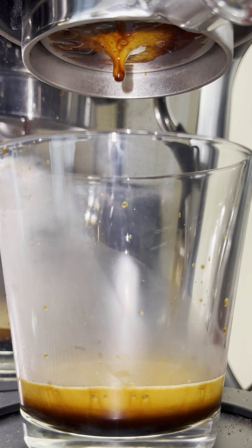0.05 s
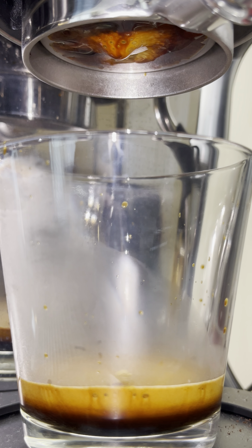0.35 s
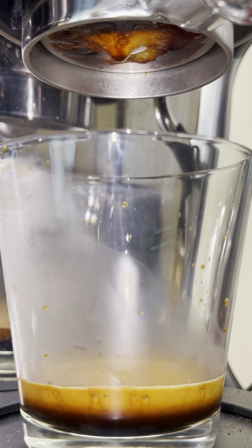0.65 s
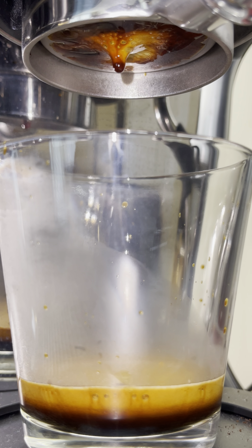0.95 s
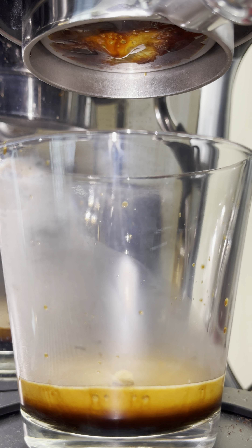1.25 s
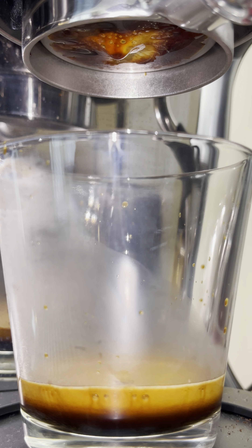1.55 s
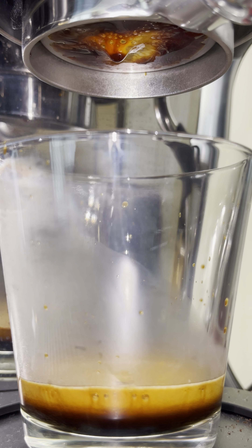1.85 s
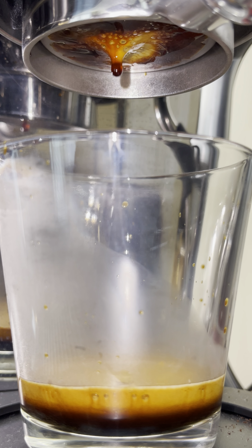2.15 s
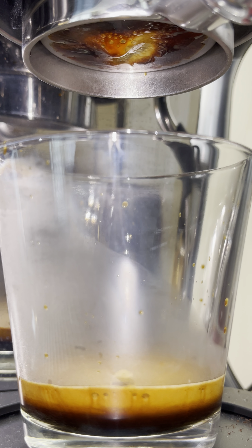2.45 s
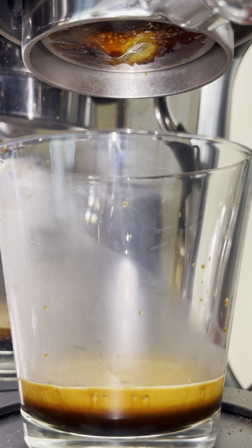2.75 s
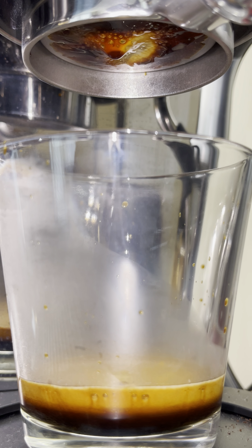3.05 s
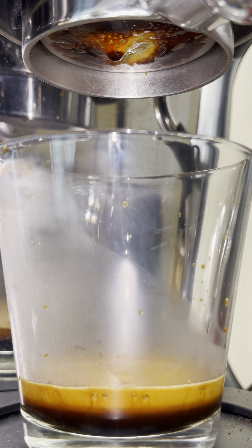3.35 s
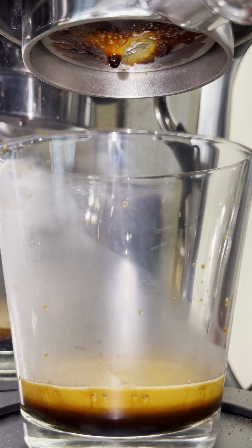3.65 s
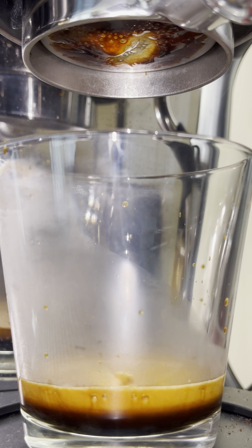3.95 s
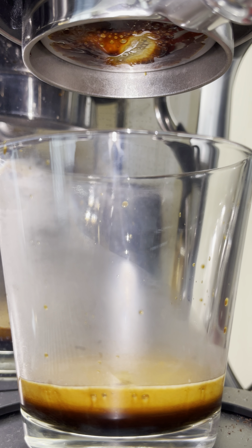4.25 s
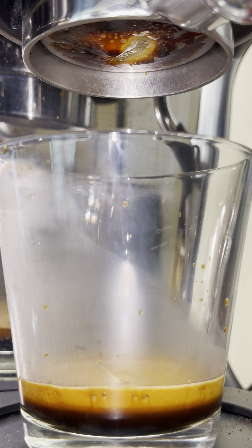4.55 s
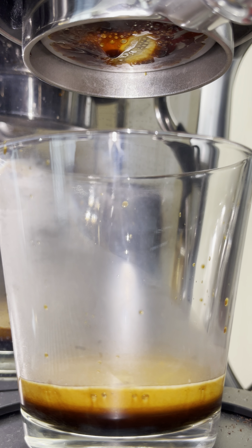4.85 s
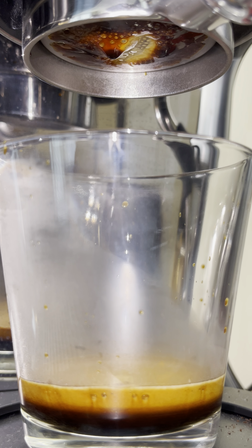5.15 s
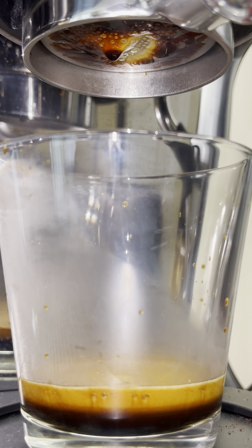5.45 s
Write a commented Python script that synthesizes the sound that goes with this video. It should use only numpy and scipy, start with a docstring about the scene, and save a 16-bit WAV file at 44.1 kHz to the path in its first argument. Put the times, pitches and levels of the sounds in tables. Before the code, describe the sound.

Coffee drops plip into a glass over an espresso machine's low hum and thin hiss, with one hollow knock early on.

```python
"""Motors hum in a small kitchen, a hot espresso machine buzzes and leaks a thin hiss, wet coffee seethes.
Close by, foam bubbles snap and the last drops plip into the crema, each ringing a pocket of air.
Just before the first second is up, the casing slips in its seat and gives one hollow knock.
The seething settles and the mains buzz dies away; the hiss turns brighter, a fan throbs,
and a faint whistle comes and goes near the end."""
import sys
import numpy as np
from scipy import signal
from scipy.fft import rfft, irfft
from scipy.io import wavfile

SR = 44100
rng = np.random.default_rng(int(sys.argv[2]) if len(sys.argv) > 2 else 0)


def pcm_store(signal):
    """Save signal as 16-bit PCM."""
    levels = np.round(np.clip(np.atleast_2d(signal), -1, 1) * 32767)
    wavfile.write(sys.argv[1], SR, levels.astype(np.int16).T)


N = 246959
TIME = np.arange(N) / SR
FREQ = np.maximum(np.arange(N // 2 + 1) * SR / N, 1)
KNOCK_S = 0.8619

# The motor drone. Each row: pitch in Hz, rms level at mid-scene in dB, level slope in dB per second.
MOTOR_TONES = [(46.3, -62, -0.5), (59.2, -54.5, -0.5), (87.5, -54, -0.5), (94.9, -69, 2),
               (213.6, -72.5, -1), (223.2, -63.5, -1.57), (239, -72.5, 1), (363, -76, .5), (363, -77, -1),
               (449, -75, -2.5), (503, -77.5, 0.5), (528, -77, -0.5), (554, -86.5, -2.5), (597, -79, -2.5),
               (950, -90.5, 1.5), (1121, -95, 2.5)]
# The fan's level ride. Each row: time in seconds, rms level of its stronger tone in dB.
FAN_RIDE = [(0, -60), (1.2, -60), (2.6, -66.5), (3.5, -59.5), (5, -54.5), (5.6, -55.5)]
# Room tone of moving air. Each row: frequency in Hz, level in dB per Hz.
RUMBLE_SPECTRUM = [(15, -116), (28, -91), (45, -82), (95, -75.5), (135, -80), (195, -83), (220, -77.5),
                   (255, -86), (335, -80), (510, -87.5), (610, -94.5), (730, -94), (850, -100),
                   (1020, -100), (1350, -104), (1700, -113), (5000, -130), (14000, -144)]
# Stereo image of the rumble. Each row: frequency in Hz, left-right likeness from 0 (wide) to 1 (mono).
RUMBLE_LIKENESS = [(60, 1), (130, 0.98), (270, 0.97), (580, 0.49), (1000, 0.023), (2000, 1), (5000, 0.56)]
# Panning of rumble and hiss. Each row: frequency in Hz, left minus right in dB.
AIR_BALANCE = [(60, 0), (110, -.5), (190, -2), (350, -2), (1100, -1.2), (2800, -.5), (4500, -2.8),
               (5700, 0)]
# The leak's resonances, in three registers. Each row: centre in Hz, width in Hz,
# crest level in dB per Hz before the level ride, left lead in ms.
LEAK_LOW = [(2270, 810, -108.5, 0.046), (3024, 170, -106.5, 0.074), (3650, 580, -112.5, 0.043)]
LEAK_MID = [(4420, 300, -99.3, -0.044), (4900, 240, -104, 0.103), (5720, 300, -99, 0.169),
            (6280, 470, -104, 0.17), (6800, 250, -107, 0.173), (7390, 290, -101.5, 0.17)]
LEAK_HIGH = [(8140, 500, -115.0, 0.171), (9160, 290, -114.5, 0.165), (9790, 290, -107.5, 0.162),
             (10480, 450, -104.0, 0.162), (11040, 390, -106.0, 0.16), (11510, 220, -114.0, 0.159),
             (12020, 230, -112.5, 0.16)]
# A very high sheen. Each row: centre in Hz, width in Hz, crest level in dB per Hz before the ride.
SHEEN_BANDS = [(12900, 350, -129), (13550, 280, -125), (14800, 450, -129)]
# Tone colour of the mains buzz. Each row: frequency in Hz, rms level in dB before the fade.
BUZZ_SPECTRUM = [(840, -91), (960, -84), (1200, -81.5), (1320, -79.5), (1560, -81), (1680, -85.5),
                 (1920, -86), (2400, -99.5), (3600, -104)]
# Tone colour of the wet coffee. Each row: frequency in Hz, level in dB per Hz before the fade.
SEETHE_SPECTRUM = [(200, -110), (600, -99), (1250, -101), (2000, -109), (3500, -118), (9000, -135)]
# Foam films bursting. Each row: start in seconds, level in dB, centre in Hz, width in octaves,
# fizz in dB relative to the crack.
FOAM_SNAPS = [(0.077, -67.5, 3800, 0.79, -10), (0.216, -63, 4500, 1, -2), (0.235, -40.5, 2500, 1.1, -6),
              (0.2366, -41, 6300, 0.44, -10), (0.249, -49.5, 3000, .9, 7), (0.2487, -42.5, 6250, 0.38, -7),
              (1.002, -63, 3000, 0.25, -23), (1.013, -64, 2000, 1.6, -20), (1.147, -65, 3900, .8, -16),
              (1.157, -49, 5900, 0.14, -20), (1.4396, -58, 4600, 0.68, 4), (2.343, -64, 4100, .5, -20),
              (2.352, -62, 3200, 1.1, -20), (2.684, -65, 1100, 1.6, -20), (3.8991, -42.5, 5300, 0.26, -5),
              (4.048, -58, 3480, 1.2, -18)]
# Air pockets ringing in the glass. Each row: start in seconds, level in dB, starting pitch in Hz,
# time to fall 60 dB in seconds.
AIR_POCKETS = [(0.2168, -46, 1520, .026), (0.2349, -33.5, 2360, 0.021), (0.2351, -41, 1680, 0.022),
               (0.2352, -40, 3500, .014), (0.2365, -49, 1314, 0.061), (0.24, -38, 476, 0.044),
               (0.2492, -49, 2450, 0.026), (0.249, -52, 1000, 0.045), (0.249, -52, 1520, 0.035),
               (0.2523, -45, 3000, 0.026), (1.002, -49, 2570, .016), (1.014, -55, 1320, 0.034),
               (1.146, -52, 1550, .022), (1.4395, -42.5, 1125, .027), (1.559, -59, 1290, .03),
               (2.321, -60, 1580, .026), (2.3424, -56.5, 1290, 0.045), (2.683, -47.5, 421, 0.079),
               (2.686, -65, 3420, .035), (3.867, -58, 1590, 0.024), (3.8995, -45.5, 1600, 0.019),
               (3.8997, -47, 2320, 0.017), (3.8996, -33, 5320, 0.0082), (3.9002, -38.5, 4340, 0.012),
               (3.9014, -41.5, 3810, .021), (4.047, -55.5, 2390, .02)]
# Modes of the casing's panels. Each row: pitch in Hz, peak level in dB, time to peak in seconds,
# left lead in ms, left minus right in dB.
PANEL_MODES = [(151.2, -36, 0.018, 0.18, 2), (205, -40, 0.017, 0, -0.5), (278.3, -27.5, 0.0045, 0.018, 2),
               (402, -19.5, 0.0063, 0.079, -1.5), (538, -39, 0.016, -0.1, -1.5),
               (630, -40, .011, 0.0069, -4), (730, -35.5, 0.012, 0.31, 4), (800, -41, 0.013, -0.049, 2),
               (1024, -34.5, 0.0063, 0.19, -2.5), (1225, -36, 0.0084, -0.16, 9),
               (1501, -35, 0.006, -0.084, 0.5), (1688, -34.5, 0.0038, 0.058, -1),
               (2046, -22, 0.0032, 0.036, -.5), (2317, -43, 0.006, 0.079, 0),
               (2450, -41.5, .006, 0.092, 2.5), (3076, -30.5, 0.0039, 0.029, 0),
               (3440, -31.5, 0.0021, -0.051, -1), (3850, -45.5, 0.005, -0.11, 10),
               (4130, -41, 0.0038, -0.072, -1), (4410, -37, 0.0051, 0.078, -5)]
# The whistle's level ride. Each row: time in seconds, rms level in dB.
WHISTLE_RIDE = [(2.6, -92), (3.8, -84), (4.1, -77.5), (4.25, -85), (4.44, -73), (4.58, -85.5), (5.0, -81),
                (5.23, -87), (5.5, -81.5)]


def from_db(db):
    """Decibels to gain."""
    return 10 ** (np.asarray(db) / 20)


def over_hz(points):
    """Spread (Hz, value) breakpoints over every frequency, on a log scale."""
    hz, value = np.transpose(points)
    return np.interp(np.log(FREQ), np.log(hz), value)


def noise(gain):
    """Noise with the given amplitude per root Hz."""
    return irfft(rfft(rng.standard_normal(N)) * gain * np.sqrt(SR / 2), N)


def diffuse(gain, alike):
    """Mid-side noise, from wide (alike 0) to mono (alike 1)."""
    mid = noise(gain * np.sqrt((1 + alike) / 2))
    side = noise(gain * np.sqrt((1 - alike) / 2))
    return np.array([mid + side, mid - side])


def drift(rate_hz):
    """Slow random modulation with spread 1."""
    slow = noise(1 / (1 + (FREQ / rate_hz) ** 2))
    return (slow - slow.mean()) / slow.std()


def tone(hz, db, wobble_rad=0):
    """A sine at the given rms level, with optional phase wobble."""
    return np.sqrt(2) * from_db(db) * np.sin(2 * np.pi * (hz * TIME + rng.random()) + wobble_rad)


def crackle(size, centre_hz, octaves, grain_db=5, grain_samples=24):
    """Tiny noise grains of uneven size in one band, rms 1."""
    edges_hz = np.clip(centre_hz * 2 ** (np.array([-.5, .5]) * octaves), 20, SR / 2 - 1000)
    grain_gains = from_db(grain_db * rng.uniform(-1, 1, size // grain_samples + 1))
    grains = np.repeat(grain_gains, grain_samples)[:size] * rng.standard_normal(size)
    band = signal.sosfilt(signal.butter(2, edges_hz, "band", fs=SR, output="sos"), grains)
    return band / band.std()


def dying(t, t60):
    """Exponential decay, 60 dB down after t60 seconds."""
    return np.exp(-np.log(1000) * t / t60)


def settling(settle_s):
    """A ramp from 0 towards 1 that moves ever more slowly."""
    return 1 - np.exp(-TIME / settle_s)


def swell(t, peak_s, steepness):
    """An envelope that builds to 1 at peak_s and dies again."""
    return (t / peak_s * np.exp(1 - t / peak_s)) ** steepness


def from_side(x, lead_ms, left_db=0):
    """Pan by time and level: positive values make the left side earlier and louder."""
    hz = np.arange(len(x) // 2 + 1) * SR / len(x)
    late = irfft(rfft(x) * np.exp(-2j * np.pi * hz * lead_ms / 1000), len(x))
    return np.array([x * from_db(left_db / 2), late * from_db(-left_db / 2)])


def add(out, start_s, sound):
    """Mix a short sound in at its cue."""
    start = int(start_s * SR)
    out[:, start:start + sound.shape[-1]] += sound


def motors(wander_rad=0.14, waver_db=1.0):
    """Motor tones waver slightly in pitch and level and beat against each other."""
    out = np.zeros(N)
    for hz, db, db_per_s in MOTOR_TONES:
        ride_db = db + db_per_s * (TIME - TIME.mean()) + waver_db * drift(1.5)
        out += tone(hz, ride_db, wander_rad * drift(0.8))
    return out


def fan(hz=111.7, partner_hz=107.55, partner_db=-6.5):
    """Two close tones throb about four times a second as they ebb and swell."""
    db = np.interp(TIME, *np.transpose(FAN_RIDE))
    return tone(hz, db) + tone(partner_hz, db + partner_db)


def rumble():
    """Moving air fills the room with a low bed, near mono in the bass."""
    return diffuse(from_db(over_hz(RUMBLE_SPECTRUM)), over_hz(RUMBLE_LIKENESS))


def jet(resonances):
    """Turbulence rings in the narrow passages of the leak, each panned by its own delay."""
    return sum(from_side(noise(from_db(db) / (1 + 2 * ((FREQ - hz) / width) ** 2)), lead_ms)
               for hz, width, db, lead_ms in resonances)


def hiss(waver_db=0.67, sheen_lead_ms=0.148):
    """The hiss brightens: lows and mids fade, highs level off; a faint, very high sheen fades in."""
    low_db = 0.5 - 0.94 * TIME
    mid_db = 0.5 - 1.28 * TIME + waver_db * drift(2.3)
    high_db = 1.5 + 8 * settling(settle_s=0.76) + waver_db * drift(1.5)
    sheen_db = -7.5 + 2.5 * TIME
    sheen = [(*row, sheen_lead_ms) for row in SHEEN_BANDS]
    layers = (sheen_db, sheen), (mid_db, LEAK_MID), (high_db, LEAK_HIGH), (low_db, LEAK_LOW)
    return sum(from_db(ride_db) * jet(resonances) for ride_db, resonances in layers)


def lean_right(x):
    """Tip some bands a little to the right."""
    return irfft(rfft(x) * from_db(over_hz(AIR_BALANCE) * [[.5], [-.5]]), N)


def buzz(fundamental_hz=120, start_db=1.5, sag_db_per_s=5.5, stop_s=2.4):
    """A coil shakes the sheet metal at twice the mains rate; its upper harmonics sag, then die away."""
    hz, db = np.transpose(BUZZ_SPECTRUM)
    harmonics = fundamental_hz * np.arange(7, 28)
    sag = from_db(start_db - sag_db_per_s * TIME)
    release = dying(np.maximum(TIME - stop_s, 0), t60=0.87)
    return sag * release * sum(tone(f, np.interp(f, hz, db)) for f in harmonics)


def seethe(start_db=-1.5, sink_db=19.5):
    """The wet coffee seethes softly and settles to a lower level."""
    fade = from_db(start_db - sink_db * settling(settle_s=1.7))
    return fade * diffuse(from_db(over_hz(SEETHE_SPECTRUM)), alike=0.66)


def snaps(attack_s=0.00068):
    """A bursting foam film gives a short wet crackle with a fizz of droplets on top."""
    out, t = np.zeros((2, N)), TIME[:SR // 8]
    for start_s, db, hz, octaves, fizz_db in FOAM_SNAPS:
        fizz = crackle(len(t), centre_hz=11000, octaves=.17) * dying(t, t60=0.015)
        crack = crackle(len(t), hz, octaves) * dying(t, t60=0.0062 + 0.027 * octaves)  # broad lasts longer
        burst = from_side(crack, lead_ms=.033) + from_db(fizz_db) * from_side(fizz, lead_ms=-.015)
        add(out, start_s, from_db(db) * burst * (1 - dying(t, attack_s)))
    return out


def plips(pitch_rise=0.083, attack_s=0.0013):
    """Each pocket of air rings briefly, bending up in pitch as it nears the surface."""
    out, t = np.zeros((2, N)), TIME[:SR // 8]
    for start_s, db, hz, t60 in AIR_POCKETS + shed_bubbles():
        glide_hz = hz * (1 + pitch_rise * np.minimum(t / t60, 1))
        phase = 2 * np.pi * np.cumsum(glide_hz) / SR
        envelope = from_db(db) * dying(t, t60) * (1 - dying(t, attack_s))
        add(out, start_s, from_side(envelope * np.sin(phase), lead_ms=0.04))
    return out


def shed_bubbles(relative_db=-16, pitch_ratio=1.25, scatter=0.3, within_s=0.002):
    """A quieter bubble, usually smaller and higher, breaks off each pocket; rows as in AIR_POCKETS."""
    start_s, db, hz, t60 = np.transpose(AIR_POCKETS)
    delay, detune = rng.random((len(AIR_POCKETS), 2)).T
    ratio = pitch_ratio * (1 + scatter * (2 * detune - 1))
    return list(zip(start_s + within_s * delay, db + relative_db, hz * ratio, t60 / ratio))


def knock(grit_db=-46, scrape_db=-52, shudder_db=-39):
    """The hot casing slips in its seat: a few ms of grit set the panels ringing and the frame shaking."""
    out, t = np.zeros((2, N)), TIME[:SR // 5]
    for k, (hz, db, peak_s, lead_ms, left_db) in enumerate(PANEL_MODES):
        mode = (-1) ** k * from_db(db) * swell(t, peak_s, steepness=2.7) * np.sin(2 * np.pi * hz * t)
        add(out, KNOCK_S, from_side(mode, lead_ms, left_db))
    grit = crackle(len(t), centre_hz=2500, octaves=2.1) * swell(t, peak_s=0.0052, steepness=2.5)
    scrape = crackle(len(t), centre_hz=11000, octaves=0.15) * swell(t, peak_s=0.004, steepness=3.1)
    slip = from_db(grit_db) * grit + from_db(scrape_db) * scrape
    add(out, KNOCK_S - .002, from_side(slip, lead_ms=0.02))
    # the frame's many weak modes blur into noise, partly shared between the sides
    shudder = np.array([crackle(len(t), centre_hz=636, octaves=3.2) for side in range(2)])
    shudder = shudder + .5 * shudder[::-1]
    add(out, KNOCK_S, from_db(shudder_db) * shudder * swell(t, peak_s=0.0066, steepness=0.93))
    return out


def back_of_casing(level_db=-49.5):
    """The far panels throw a broad, unpitched share of the knock at the wall behind."""
    out, t = np.zeros((2, N)), TIME[:SR // 10]
    burst = crackle(len(t), centre_hz=1500, octaves=1.6) * swell(t, peak_s=0.0035, steepness=1)
    add(out, KNOCK_S, from_db(level_db) * burst)
    return out


def kitchen(send, t60=0.35, cutoff_hz=9100, predelay_s=0.0018, crossfeed=0.87):
    """Counter and walls return dense reflections with a softened top and a narrow stereo image."""
    t = TIME[:SR // 2]
    decay = dying(t, t60)
    tail = rng.standard_normal((2, len(t))) * decay * (t > predelay_s)
    tail = signal.sosfilt(signal.butter(2, cutoff_hz, fs=SR, output="sos"), tail)
    tail = tail + crossfeed * tail[::-1]
    return signal.fftconvolve(send, tail / np.sqrt(np.sum(decay ** 2)), axes=1)[:, :N]


def whistle(hz=1348, wander_rad=1.3):
    """One thin tone surfaces late, wavering in pitch as it swells and dips."""
    db = np.interp(TIME, *np.transpose(WHISTLE_RIDE))
    return tone(hz, db, wander_rad * drift(3))


def scene(drip_send_db=-24, knock_send_db=-18.5, knock_send_cutoff_hz=1650):
    """Close drips and the knock, with a touch of room, over the steady bed of the kitchen."""
    drips = plips() + snaps()
    thump = knock()
    # mostly the low part of the knock spreads into the room
    dull_thump = signal.sosfilt(signal.butter(2, knock_send_cutoff_hz, fs=SR, output="sos"), thump)
    room = kitchen(from_db(drip_send_db) * drips + from_db(knock_send_db) * dull_thump + back_of_casing())
    bed = seethe() + lean_right(rumble() + hiss()) + motors() + fan() + buzz()
    return bed + drips + thump + room + whistle()


def record(dry, cutoff_hz=15700):
    """A steep low-pass trims the very top of the mix."""
    return signal.sosfilt(signal.ellip(10, .1, 80, cutoff_hz, fs=SR, output="sos"), dry)


dry = scene()
out = record(dry)
pcm_store(out)
```